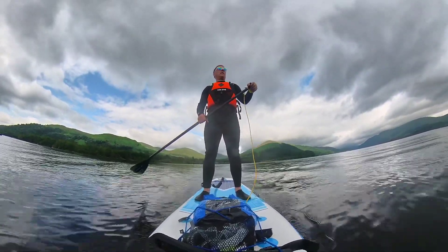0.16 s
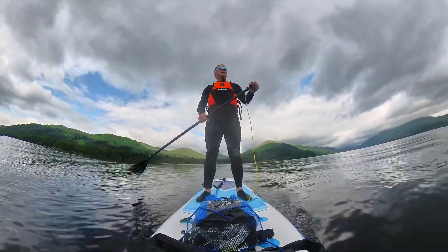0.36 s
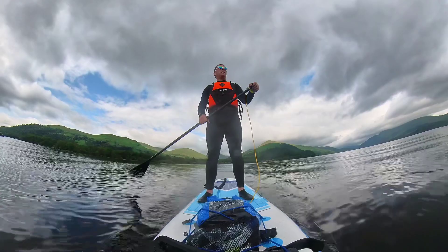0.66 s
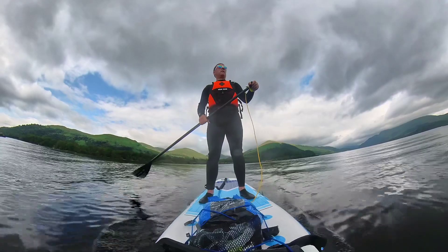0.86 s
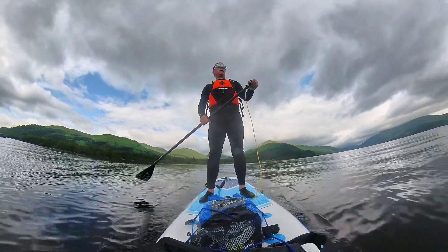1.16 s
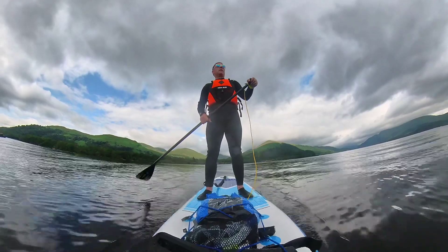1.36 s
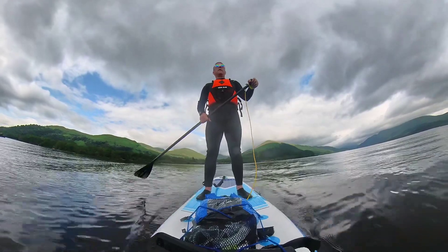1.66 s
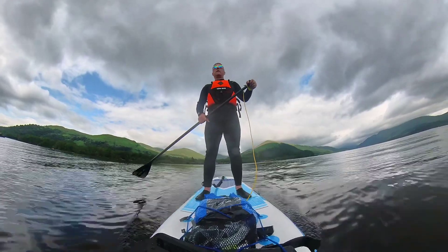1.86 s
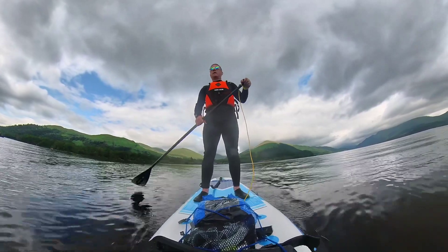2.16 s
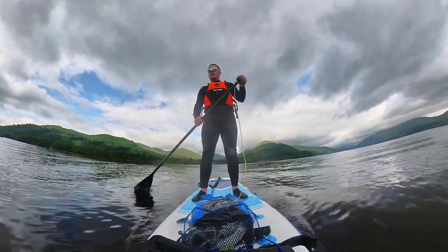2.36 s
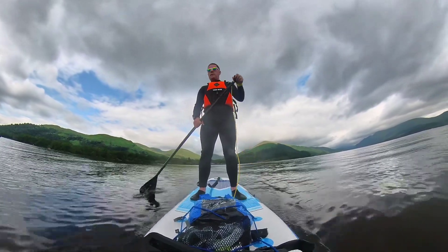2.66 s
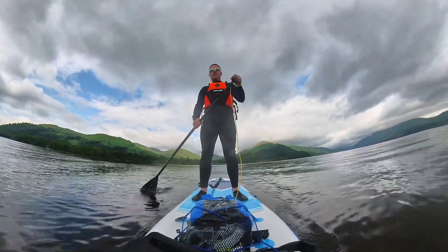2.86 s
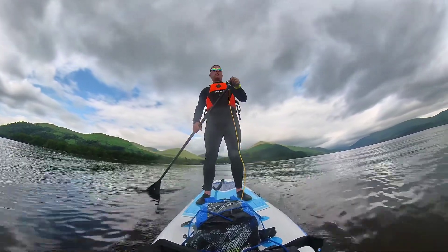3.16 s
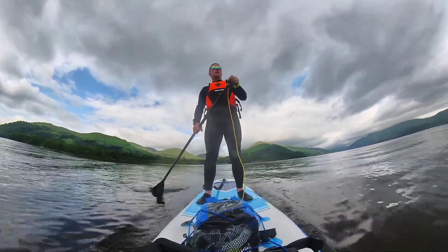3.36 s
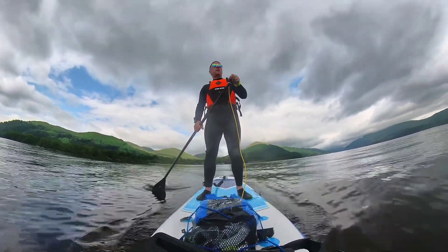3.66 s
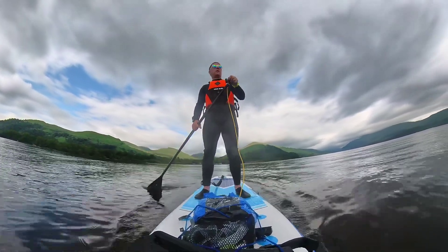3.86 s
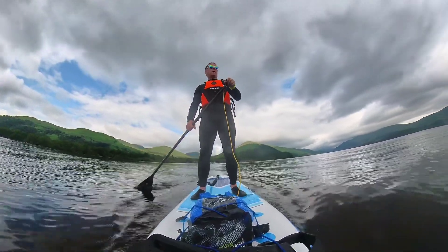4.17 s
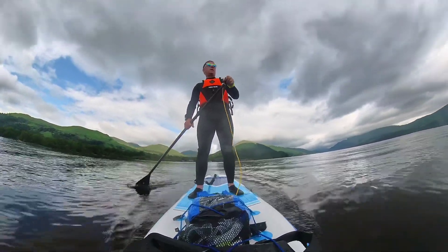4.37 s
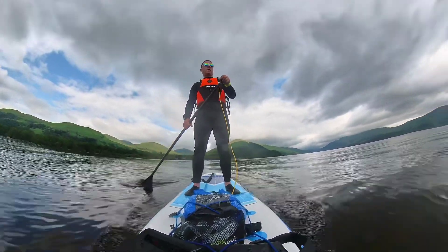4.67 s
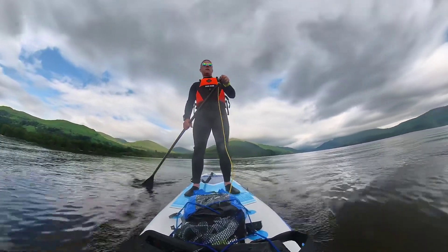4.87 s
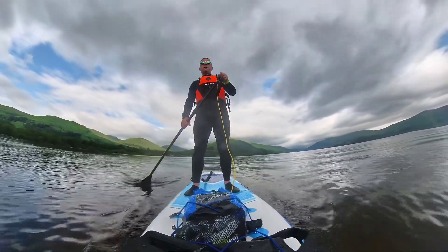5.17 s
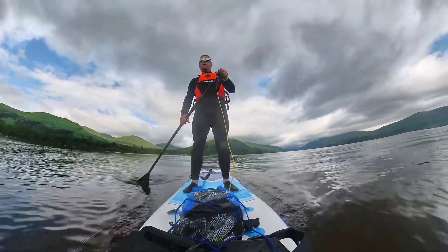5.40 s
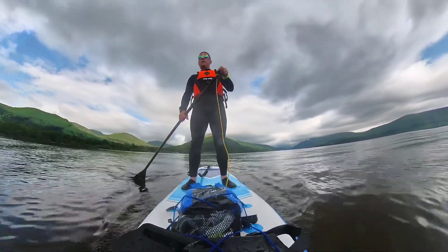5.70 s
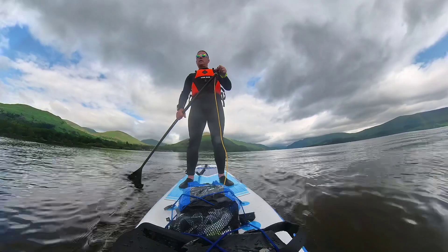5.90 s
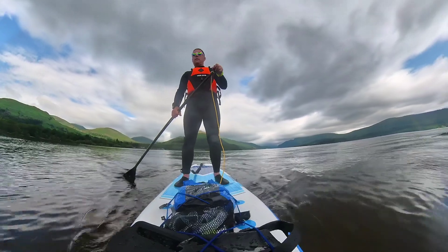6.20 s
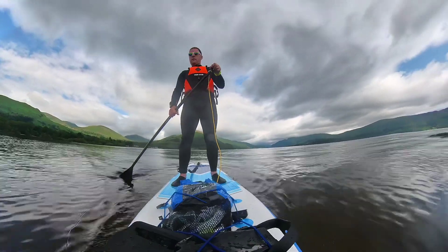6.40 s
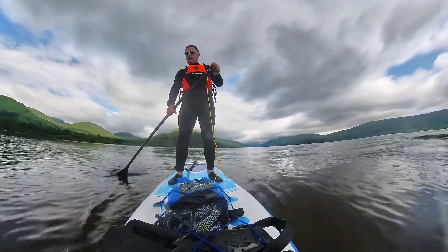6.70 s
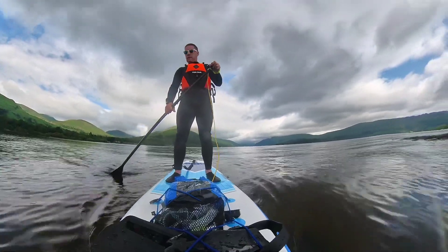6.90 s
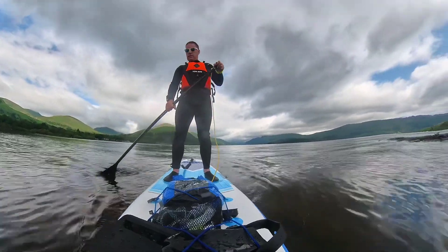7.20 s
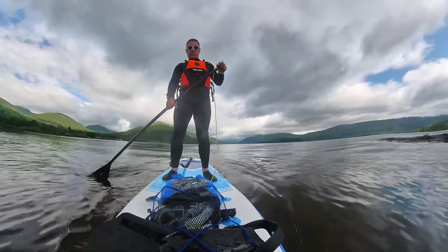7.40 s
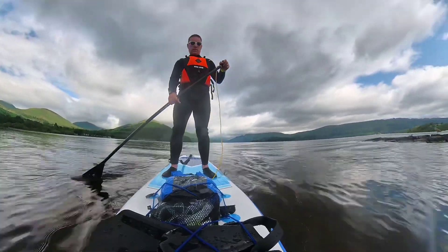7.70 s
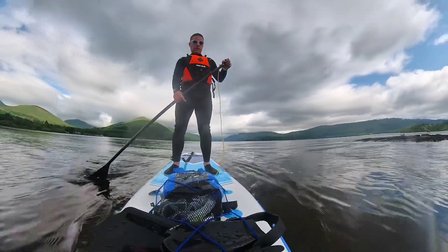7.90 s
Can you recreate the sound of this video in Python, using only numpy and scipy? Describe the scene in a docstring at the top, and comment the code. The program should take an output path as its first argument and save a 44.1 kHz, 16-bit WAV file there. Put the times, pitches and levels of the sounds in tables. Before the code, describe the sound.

Hollow knocking water slaps, gurgling wash and low booms under a paddleboard gliding on a calm lake, thinning to near quiet after six seconds.

```python
"""Dull, knocking slaps, a gurgling wash between them and low booms: a paddleboard gliding over a calm lake.
Water hits, bubbles and trapped air drive the ringing modes of the hollow board, heard in a housing on its deck.
Flung drops crack and spit, lone bubbles sing, and slaps throw a faint airy spray.
Behind them the open lake ripples over a thin flickering hiss: coloured, patchy noise."""
import sys
import numpy as np
from scipy import signal
from scipy.io import wavfile
from scipy.ndimage import uniform_filter1d, minimum_filter1d

SR = 44100
rng = np.random.default_rng(int(sys.argv[2]) if len(sys.argv) > 2 else 0)


def dump(signal):
    """Clip the signal to [-1, 1] and save it as 16-bit WAV at the path in sys.argv[1]."""
    limited = np.clip(np.atleast_2d(signal).T, -1, 1)
    pcm = np.round(limited * 32767).astype(np.int16)
    wavfile.write(sys.argv[1], SR, pcm)


N = 355001
TIME = np.arange(N) / SR
RING_TIME = np.arange(SR // 2) / SR


def amp(db):
    """Decibels to gain."""
    return 10 ** (np.asarray(db) / 20)


def add(mix, start_s, sound):
    """Mixes a stereo sound in at start_s, cut at the end of the mix."""
    part = mix[:, max(round(start_s * SR), 0):][:, :sound.shape[1]]
    part += sound[:, :part.shape[1]]


def convolve(drive, response):
    """Plays a mono drive through a stereo response."""
    return signal.oaconvolve(drive[None], response, axes=1)


def strength(sound, size=900):
    """Rms over the first `size` samples of a blow."""
    return np.sqrt(np.mean(sound[:, :size] ** 2) + 1e-30)


# modes of board and housing: f/Hz, t60/s, left level/dB, right level/dB, lead of left over right/rad
BOARD_MODES = [(87, 0.028, -23, -16.5, 4), (108.6, 0.11, -11.5, -7, 0.23), (134.2, 0.35, -6.5, 5, 0),
               (167.3, 0.28, 0, -14, -5), (242.2, 0.28, -17, -10.5, 1.27), (309, 0.047, -17, -11.5, -0.3),
               (356.3, 0.26, -6, -5, -1.88), (401, 0.056, -2, -2.5, -0.63), (443.3, 0.17, -0.5, -7, 0.44),
               (668.5, 0.066, -5.5, -1.5, 2), (674.7, 0.21, -7, -5, 5), (749.4, 0.093, -26, 2, 1),
               (880.5, 0.056, -9, -6, 1.5), (971, 0.038, -8, -8, 0.06), (1075, 0.037, -13.5, -20, -2.1),
               (1209, 0.059, -6, -9.5, 1.16), (1390, 0.058, -29.5, -21.5, 1.5),
               (1491, 0.072, -12, -18.5, 1.05), (1649, 0.039, -14, -13, 1.55), (1772, 0.016, -40, -21, 3.5),
               (1959, 0.084, -16, -13.5, 2), (2556, 0.01, -36.5, -28.5, 4), (2863, 0.023, -38, -30, 4),
               (3150, 0.033, -32, -34, 2.5), (3405, 0.018, -37, -33, 4), (3704, 0.0099, -43.5, -37.5, 2.5),
               (4100, .012, -56, -53, 3), (5000, .01, -61, -61, -0.5)]


def mode_rings(punch=1.9, punch_t60_s=0.034):
    """Each mode swells within a cycle, loses most of its swing to the water at once, then rings on."""
    low_wall_hz, high_wall_hz = 2080, 5200
    rings = []
    for hz, t60_s, *_ in BOARD_MODES:
        fade = amp(-60 * RING_TIME / t60_s) + punch * amp(-60 * RING_TIME / punch_t60_s)
        ring = fade / fade.sum() * np.exp(2j * np.pi * hz * RING_TIME)
        swell = signal.butter(2, [hz / np.sqrt(2), hz * np.sqrt(2)], "band", fs=SR, output="sos")
        # the housing wall rounds off every edge
        wall_hz = high_wall_hz if hz > low_wall_hz else low_wall_hz
        wall = signal.butter(6, wall_hz, fs=SR, output="sos")
        rings.append(signal.sosfilt(np.vstack([swell, wall]), ring))
    return np.array(rings)


# register edges: f/Hz; boom, depth, knock, brightness and crack lie between them
REGISTER_EDGES_HZ = [0, 220, 520, 1100, 2300, 9000]


def hull_spot(rings, vary_db=-0.5, vary_phase_rad=0.96, side_phase_rad=0.1):
    """Stereo response of one random hull spot per register: each spot excites the modes differently."""
    hz, _, left_db, right_db, lead_rad = np.transpose(BOARD_MODES)
    size, turn, skew = rng.standard_normal((3, len(hz)))
    # long waves reach both sides alike
    lag_rad = lead_rad + side_phase_rad * skew * np.minimum(hz / 1000, 1)
    sides = np.array([amp(left_db), amp(right_db) * np.exp(-1j * lag_rad)])
    weight = sides * amp(vary_db * size) * np.exp(1j * vary_phase_rad * turn)
    edges = np.searchsorted(hz, REGISTER_EDGES_HZ)
    return [(weight[:, a:b] @ rings[a:b]).real for a, b in zip(edges, edges[1:])]


# water slaps on the hull: t/s, knock level/dB, depth re knock/dB, brightness re knock/dB, spatter scale/s
HULL_SLAPS = [(0.0, -28, 4.5, -8, .005), (0.016, -33.5, 5, -15, 0.0019), (0.158, -27, -4.5, -9, 0.0032),
              (0.386, -30, -1, -19, .014), (0.403, -23, -4.5, -16, .003), (0.572, -23, -1.5, -12, .015),
              (0.6, -12, -6, -10.5, .003), (0.7, -26, 2.5, -27.5, .008), (0.709, -21.5, -6.5, -19, .003),
              (0.779, -25.5, -22, -6, .008), (0.797, -25, -22.5, -7, .005), (0.916, -31.5, 8.5, 5.5, .002),
              (0.95, -21.5, -7, -16.5, .002), (1.113, -23.5, -4.5, -3.5, .003), (1.152, -27, -1, -2, .001),
              (1.313, -36, -3.5, -9.5, .001), (1.375, -34.5, -25, -7, .001), (1.422, -33, -13, -10, .003),
              (1.515, -19, -9, -10.5, .001), (1.557, -22.5, -2.5, -12, .0025), (1.699, -32.5, -8, -4, .004),
              (1.833, -34.5, -3, -6, .001), (1.903, -32.5, -6, 0, .001), (1.934, -28.5, -8, -25, .001),
              (2.051, -25, -9.5, -12, .001), (2.166, -33, -2, -19.5, .001), (2.229, -35.5, 0, -26, .001),
              (2.381, -31.5, -4, -8.5, .0024), (2.604, -25, -3.5, -29.5, .003),
              (2.628, -25.5, 2.5, -29, .002), (2.744, -35, -3, -8, .001),
              (2.782, -24.5, -12.5, -23.5, .001), (2.804, -27, -8.5, -31.5, .001),
              (2.93, -14.5, -2.5, -31, .005), (2.944, -18, -4, -10.5, .001), (2.976, -25.5, -2, -24, .002),
              (3.029, -27, 1, -3.5, .003), (3.05, -33, -6, 5, .002), (3.102, -27, 0.5, 0, .002),
              (3.153, -23.5, -2, -25, .001), (3.195, -24, -7, -1, .001), (3.363, -26, 2, -19, .013),
              (3.381, -28.5, 5, -2, .002), (3.507, -29, 1.5, -4, .002), (3.555, -17, -9, -10, .001),
              (3.626, -29, -6, 1.5, .002), (3.726, -30, 1, -5, .004), (3.826, -25, -1.5, 3.5, .002),
              (3.921, -34, -8.5, -5, .001), (4.144, -41.5, -2.5, -12, .003), (4.382, -31.5, 3, -3.5, .0024),
              (4.408, -30, 4, -12, .011), (4.427, -26.5, 1, -12, 0.0024), (4.737, -27, -2.5, -12, .0035),
              (5.097, -26, 3.5, -33.5, .005), (5.118, -19, -0.5, -14, .002), (5.206, -26.5, -7.5, -1, .001),
              (5.423, -27, -17.5, -7, .004), (5.563, -40, -1, 2.5, .001), (5.991, -35.5, -31, -9.5, .001),
              (6.157, -42, 1.5, -6, .001), (6.192, -43.5, 9, -24, .002), (6.254, -31, -5, -11, .001),
              (6.426, -42.5, -8, -13, .002), (6.48, -33, -6, -18, .0015), (6.51, -43, -13, -9, 0.0022),
              (6.835, -34, -7, -12, 0.0042), (7.68, -50.5, 10, -6, .0065),
              (7.856, -31.5, 0.5, -0.5, 0.0036), (7.869, -34.5, -5.5, -5, 0.0018),
              (7.992, -35.5, -11, -5, 0.0019), (8.004, -38, -7, 0, 0.0022)]


def slaps(rings, spatter=0.42, pieces=10):
    """A sheet of water hits the hull, and smaller pieces of it land just after."""
    crack_db, crack_slope = -38.5, 0.3  # the brighter a slap, the more it cracks
    out = np.zeros((2, N))
    for start_s, knock_db, depth_db, bright_db, spatter_s in HULL_SLAPS:
        late = -np.log(rng.uniform(1 / 20, 1, pieces))
        size = rng.standard_normal(pieces)
        drive = np.zeros(SR // 10)
        drive[0] = 1
        at = np.minimum(late * spatter_s * SR, len(drive) - 1).astype(int)
        drive[at] += spatter * size * np.exp(-late / 10)
        colour = amp([depth_db, 0, bright_db, crack_db + crack_slope * bright_db])
        registers = hull_spot(rings[:, :SR // 5], vary_db=2.5)[1:]
        for gain, response in zip(colour, registers):
            blow = convolve(drive, response)
            add(out, start_s, amp(knock_db) * gain * blow / strength(blow))
    return out


# air pockets squeezed out under the nose: t/s, level before trim/dB, starting f/Hz
AIR_POCKETS = [(0.004, -25.5, 153), (0.181, -31.5, 146), (0.399, -32.5, 163.5), (0.526, -29, 150.5),
               (0.576, -30, 142), (0.688, -29, 133.6), (1.14, -24, 121.6), (1.193, -28.5, 134.7),
               (1.561, -34, 162), (1.816, -30.5, 132), (2.01, -45, 128), (2.386, -47.5, 112),
               (2.622, -29.5, 150), (2.948, -23, 170), (3.114, -34, 160), (3.248, -36, 135),
               (3.371, -28.5, 150), (3.623, -32, 154), (3.746, -26.5, 131), (4.083, -41.5, 122),
               (4.253, -23, 127), (4.298, -31, 137.5), (4.4, -21.5, 140), (4.687, -25, 138),
               (5.097, -23, 156), (5.159, -25, 127.6), (5.36, -31, 141), (5.803, -26.5, 135),
               (6.167, -48.5, 142), (6.26, -49, 173), (6.346, -47.5, 176), (6.489, -37.5, 121),
               (6.84, -37, 126), (6.959, -44, 122), (7.642, -47, 137), (7.69, -38, 139),
               (7.798, -43.5, 108), (7.94, -37, 139)]


def booms(rings, trim_db=-1.0, rise_per_s=0.45, swell_s=0.003):
    """A large air pocket pulses briefly, rising in pitch, and rings the lowest modes of the board."""
    lean_hz, lean_db_per_octave = 146, 40  # low pockets ring the right side, higher ones the left
    out = np.zeros((2, N))
    t = RING_TIME[:SR // 8]
    for peak_s, level_db, hz in AIR_POCKETS:
        gulp = t * np.exp(-t / swell_s) * np.sin(2 * np.pi * hz * t * (1 + rise_per_s * t))
        boom = convolve(gulp, hull_spot(rings, vary_db=3.5, vary_phase_rad=0.4)[0])
        lean_db = lean_db_per_octave * np.log2(hz / lean_hz)
        boom = boom / boom.std(1, keepdims=True) * amp(np.array([[lean_db], [-lean_db]]) / 2)
        add(out, peak_s - swell_s, amp(level_db + trim_db) * boom / strength(boom, size=1600))
    return out


def churn(rings, bright_db=0.5, bubble_db=2.0, spots=6):
    """Drops and bubbles patter on several spots of the hull as the bow wave swells and ebbs."""
    wash, heave, fizz = np.zeros((3, 2, N))
    for _ in range(spots):
        boom, depth, knock, bright, crack = hull_spot(
            rings, vary_db=0.0, vary_phase_rad=1.185, side_phase_rad=0.39)
        drops = pattering(per_s=65, spread_db=4.5)
        gurgle = bubbles(low_hz=327.8, high_hz=2124, cycles=5.35, glide=0.22, per_s=55, spread_db=5.5)
        froth = bubbles(low_hz=2134, high_hz=3860, cycles=3.8, glide=0.05, per_s=47, spread_db=2.5)
        body = depth + knock + amp(bright_db) * bright
        wash += convolve(drops + amp(bubble_db) * gurgle, body)[:, :N]
        heave += convolve(drops, boom)[:, :N]
        fizz += convolve(drops / 2 + 2 * froth, crack)[:, :N]
    return sum(steadied(x) * gain for x, gain in zip((wash, heave, fizz), flow()))


# wash under the bow, strong in ripples, weaker in the glide: t/s, churn level/dB, fizz level/dB
BOW_WASH = [(0, -51.5, -96), (0.36, -54, -99), (0.419, -39, -69), (0.62, -27, -62), (0.93, -26, -54.5),
            (1.03, -38, -72.5), (1.27, -44, -75.5), (1.63, -52, -85), (2.02, -34, -70), (2.27, -59.5, -94),
            (2.57, -55, -95), (2.78, -37, -69), (3.1, -32.5, -65.5), (3.72, -33, -69), (3.9, -55, -80),
            (4.23, -53, -83), (4.6, -41.5, -70), (5.05, -40.5, -80), (5.55, -43, -74), (5.7, -55.5, -85),
            (5.95, -62, -93.5), (6.7, -71.5, -93), (7.25, -66.5, -85), (7.6, -75.5, -87), (7.8, -62.5, -77),
            (8.05, -41.5, -74)]
# wavelets breaking along the nose: t/s, length/s, churn level/dB, fizz level/dB
BREAKING_WAVELETS = [(0.0, 0.01, -39.5, -54.5), (0.167, 0.098, -33.5, -67), (0.396, 0.075, -29.5, -66.5),
                     (0.527, 0.11, -27.5, -57.5), (0.841, 0.06, -27, -58), (1.065, 0.091, -27, -60.5),
                     (1.399, 0.068, -43, -81), (1.557, 0.031, -34.5, -74), (1.666, 0.084, -34, -60.5),
                     (1.897, 0.15, -35, -58), (2.355, 0.02, -38.5, -69), (2.47, 0.022, -62, -88),
                     (2.602, 0.096, -37, -84), (2.78, 0.064, -46.5, -63), (3.106, 0.048, -35, -62),
                     (3.348, 0.022, -31, -54), (3.467, 0.056, -41.5, -57), (3.813, 0.026, -31, -64),
                     (3.964, .03, -45, -90), (4.137, 0.025, -42, -74), (4.248, 0.034, -38, -74),
                     (4.371, .11, -28, -61), (4.714, 0.16, -31, -66.5), (4.89, 0.092, -30.5, -79),
                     (5.081, 0.056, -28.5, -59.5), (5.329, 0.042, -32, -71), (5.398, 0.076, -29.5, -55),
                     (5.523, 0.039, -32, -73), (5.595, 0.043, -39, -75), (5.739, .09, -45, -71),
                     (6.231, 0.05, -48, -79), (6.338, 0.024, -50.5, -92), (6.479, 0.02, -46, -86),
                     (6.84, 0.012, -48.5, -88), (6.958, 0.037, -45, -88), (7.674, 0.025, -50, -82),
                     (7.825, 0.14, -42.5, -69)]


def flow():
    """Gains of churn, heave and fizz: powers of the bow wash and of each wavelet's gush add up."""
    rise_s, sag_db_per_s, release_db_per_s = 0.005, 16, 329
    # the hull heaves with the churn, but over a narrower range and lingering longer
    heave_db, heave_slope, heave_linger_s = -15, 0.73, 0.013
    bow_s, *bow_levels_db = np.transpose(BOW_WASH)
    power = amp([np.interp(TIME, bow_s, db) for db in bow_levels_db]) ** 2
    t = RING_TIME
    for start_s, length_s, *levels_db in BREAKING_WAVELETS:
        fall_db = sag_db_per_s * t + release_db_per_s * np.maximum(t - length_s, 0)
        gush = np.minimum(t / rise_s, 1) * amp(-fall_db)
        add(power, start_s, (amp(levels_db)[:, None] * gush) ** 2)
    wash, fizz = np.sqrt(power)
    keep = np.exp(-1 / (heave_linger_s * SR))
    heave = amp(heave_db) * signal.lfilter([1 - keep], [1, -keep], wash ** heave_slope)
    return wash, heave, fizz


def pattering(per_s, spread_db):
    """Random small impacts of either sign: many weak, a few strong."""
    when, size, sign, chance = rng.random((1500, 4)).T
    born = chance < per_s * N / SR / len(chance)
    impacts = np.sign(sign - 0.5) * amp(spread_db * np.minimum(-np.log(size), 4))
    train = np.zeros(N)
    train[(when * N).astype(int)] = impacts * born
    return train


def bubbles(low_hz, high_hz, cycles, glide, per_s, spread_db):
    """Bubbles of random size, each a short dying tone that bends upwards."""
    when, place, size, damping, chance = rng.random((700, 5)).T
    born = chance < per_s * N / SR / len(chance)
    hz = low_hz * (high_hz / low_hz) ** place[born, None]
    decay_cycles = cycles * (0.5 + damping[born, None])
    step = np.arange(SR // 32)
    age = step / SR * hz / decay_cycles  # in decay times
    phase = 2 * np.pi * decay_cycles * age * (1 + glide * np.tanh(age / 2))
    tones = np.exp(-age) * np.sin(phase)
    tones *= hz / SR * amp(spread_db * np.minimum(-np.log(size[born, None]), 4))
    at = (when[born, None] * N).astype(int) + step
    return np.bincount(at.ravel(), tones.ravel(), minlength=N)[:N]


def steadied(x, size=1900):
    """Takes out the slow chance swells of a patter and keeps its grain."""
    power = uniform_filter1d(uniform_filter1d((x ** 2).mean(0), size), size)
    return x / np.sqrt(abs(power) + np.mean(power) / 20)


# flung drops on deck and housing: t/s, crack level/dB, spray level/dB
FLUNG_DROPS = [(0.182, -58, -90.5), (0.886, -50.5, -97), (0.92, -40, -86), (1.15, -40, -75),
               (1.311, -49.5, -78), (1.375, -72, -100), (1.834, -62, -88), (2.779, -61.5, -73),
               (3.153, -61, -79), (3.194, -44, -70), (3.508, -52, -86.5), (3.558, -59, -78),
               (3.628, -56, -80), (3.725, -56, -83.5), (3.823, -48.5, -77), (5.119, -55, -86),
               (5.204, -47, -70), (5.489, -50, -92), (6.158, -64.5, -90), (6.257, -60.5, -82),
               (6.424, -68.5, -94), (7.941, -47, -65), (7.95, -46.5, -65), (8.004, -58, -82)]


def spits(rings, low_hz=3600, high_hz=5600, dull_hz=3900, spray_t60_s=0.035, spatter_s=0.003, count=6):
    """A drop breaks into a few pieces that crack on the soft deck, and bursts into a brief fine spray."""
    out = np.zeros((2, N))
    t = RING_TIME[:SR // 10]
    band = signal.butter(3, [low_hz, high_hz], "band", fs=SR, output="sos")
    deck = signal.butter(8, dull_hz, fs=SR, output="sos")
    for start_s, crack_db, spray_db in FLUNG_DROPS:
        shared, *sides = rng.standard_normal((3, len(t)))
        burst = np.sqrt(t) * amp(-60 * t / spray_t60_s)
        spray = signal.sosfilt(band, (shared + np.array(sides) / 2) * burst)
        landing = (rng.exponential(spatter_s, count) * SR).astype(int)
        pieces = np.bincount(landing, rng.standard_normal(count))
        response = hull_spot(rings[:, :len(t)], vary_db=3.0)[-1]
        crack = signal.sosfilt(deck, convolve(pieces, response)[:, :len(t)])
        sound = amp(crack_db) * crack / strength(crack) + amp(spray_db) * spray / strength(spray)
        add(out, start_s, sound)
    return out


# single bubbles that stand out of the wash: t/s, peak level/dB, starting f/Hz
LONE_BUBBLES = [(0.873, -21, 350), (0.954, -19.5, 760), (1.134, -14.5, 409), (1.28, -40.5, 1680),
                (1.687, -54.5, 2900), (1.8, -51.5, 2410), (1.824, -25.5, 326), (1.981, -45, 2610),
                (2.976, -20, 397), (3.773, -25.5, 263), (3.824, -13.5, 295), (5.533, -31.5, 1270),
                (5.559, -32, 1640), (5.607, -35, 900), (5.64, -32, 760), (5.825, -46, 1910),
                (6.194, -41, 630), (6.34, -46.5, 1620), (6.66, -51.5, 1500), (7.171, -52, 1720),
                (7.19, -51, 1790), (7.255, -54.5, 690), (7.313, -51, 990), (7.581, -50.5, 1720),
                (7.731, -43, 198)]


def blips(swell_s=0.0029, rise_per_s=1.0):
    """A lone bubble swells, sings with a slight rise and dies."""
    out = np.zeros((2, N))
    t = RING_TIME[:SR // 10]
    for start_s, peak_db, hz in LONE_BUBBLES:
        envelope = t / swell_s * np.exp(1 - t / swell_s)
        tone = envelope * np.sin(2 * np.pi * hz * t * (1 + rise_per_s * t))
        add(out, start_s, amp(peak_db) * np.array([tone, tone]))
    return out


def mist(re_knock_db=-49.0, t60_s=0.24, low_hz=4000):
    """Every slap throws a faint airy spray, decaying band noise that grows with its force."""
    out = np.zeros((2, N))
    t = RING_TIME[:SR // 8]
    for start_s, knock_db, *_ in HULL_SLAPS:
        fade = amp(knock_db + re_knock_db - 60 * t / t60_s)
        add(out, start_s, fade * rng.standard_normal((2, len(t))))
    band = signal.butter(1, [low_hz, 2 * low_hz], "band", fs=SR, output="sos")
    return signal.sosfilt(band, out)


# spectrum of the open lake's faint rippling: f/Hz, relative level/dB
LAKE_SPECTRUM = [(35, -49), (60, -14.5), (125, 0), (299, -29), (478, -13.5), (546, -16), (656, -24),
                 (1120, -14.5), (1700, 4), (1850, -1.5), (2680, -19.5), (3270, -50), (4250, -78),
                 (7190, -120)]
# swell of the rippling: t/s, level re ripple_db/dB
LAKE_SWELL_DB = [(0, -3), (2.5, -4), (4.2, 2.5), (6.5, -3.5), (7.15, 3.5), (7.5, -0.5), (7.75, 5.5),
                 (8.05, 4)]
# spectrum of the thin microphone hiss: f/Hz, relative level/dB
HISS_SPECTRUM = [(1000, 2), (4000, 1.5), (6000, -4.5), (10000, -7), (12500, 4), (13600, -1), (14000, 9.5),
                 (14400, -11.5), (15600, 5)]


def lake(ripple_db=-66.5, hiss_db=-82.5):
    """Distant ripples swell and ebb over a thin hiss, both patchy coloured noise."""
    ripples = wash_of(LAKE_SPECTRUM, patchy_db=5.0, likeness=0.5)
    hiss = wash_of(HISS_SPECTRUM, patchy_db=7.0, likeness=0.4)
    swell_db = np.interp(TIME, *np.transpose(LAKE_SWELL_DB))
    return amp(ripple_db + swell_db) * ripples + amp(hiss_db) * hiss


def wash_of(spectrum, patchy_db, likeness):
    """Coloured noise that flickers in small time-frequency patches; likeness correlates the sides."""
    hz = np.fft.rfftfreq(1024, 1 / SR)
    a, b, c, d, patches = rng.standard_normal((5, len(hz), N // 256 + 5))
    patches = uniform_filter1d(uniform_filter1d(patches, size=6, axis=0), size=9, axis=1)
    left, other = a + 1j * b, c + 1j * d
    right = likeness * left + np.sqrt(1 - likeness ** 2) * other
    f_hz, level_db = np.transpose(spectrum)
    colour_db = np.interp(np.log(hz + 1), np.log(f_hz), level_db)[:, None]
    bins = np.array([left, right]) * amp(colour_db + patchy_db * patches / patches.std())
    return evened(signal.istft(bins, nperseg=1024, noverlap=768)[1][:, :N])


def evened(x):
    """Scales a stereo sound so that its centre has rms 1."""
    return x / np.sqrt(np.mean(x.mean(0) ** 2) + 1e-30)


def scene():
    """Slaps, booms, churn and spits share the modes of one board."""
    rings = mode_rings()
    return slaps(rings) + booms(rings) + churn(rings) + spits(rings) + blips() + mist() + lake()


def record(dry, ceiling=0.45, size=131, edge_hz=15750):
    """The microphone sheds the deepest bass, a quick limiter holds the hardest slaps; then the band limit."""
    thin = signal.sosfilt(signal.butter(2, 50, "high", fs=SR, output="sos"), dry)
    gain = minimum_filter1d(ceiling / np.maximum(abs(thin).max(0), ceiling), size)
    held = thin * uniform_filter1d(gain, size)
    band_limit = signal.firwin(511, edge_hz, window=("kaiser", 9), fs=SR)
    return signal.oaconvolve(held, band_limit[None], "same")


dry = scene()
out = record(dry)
dump(out)
```